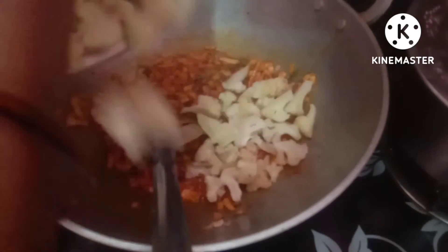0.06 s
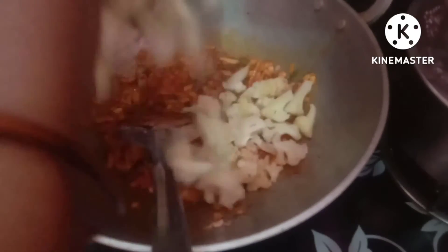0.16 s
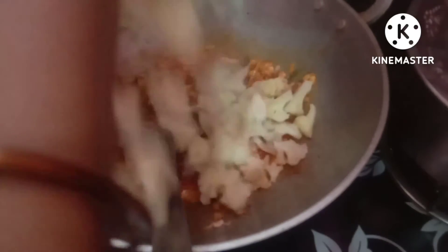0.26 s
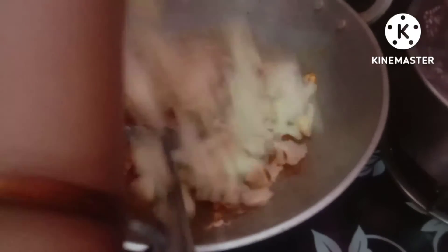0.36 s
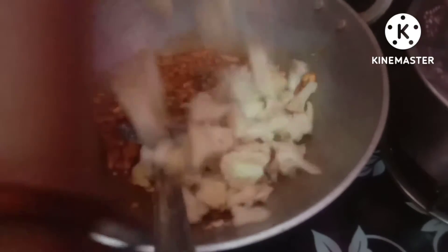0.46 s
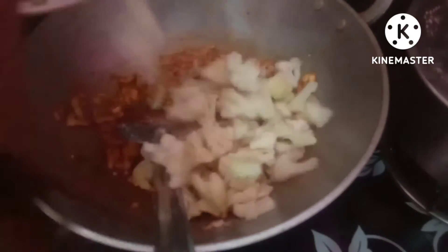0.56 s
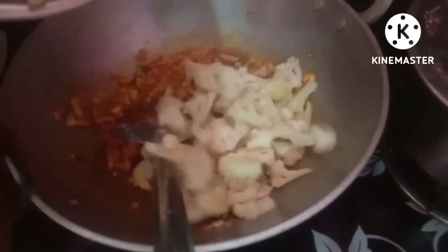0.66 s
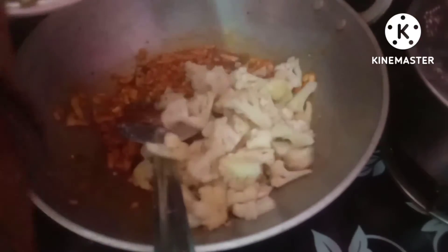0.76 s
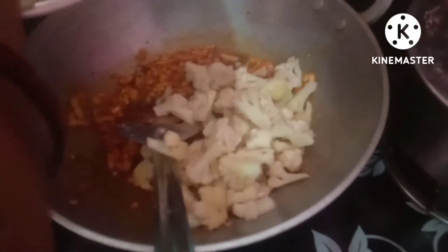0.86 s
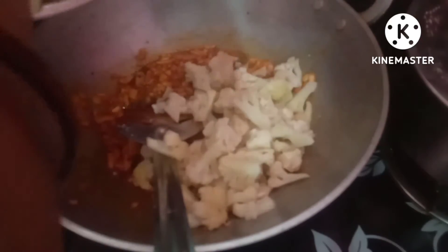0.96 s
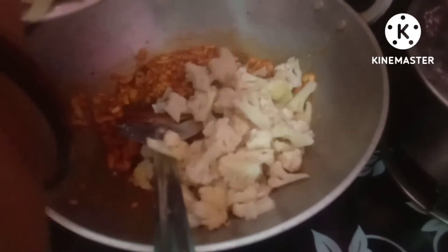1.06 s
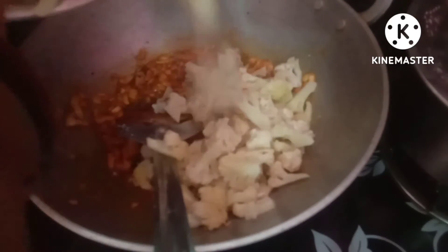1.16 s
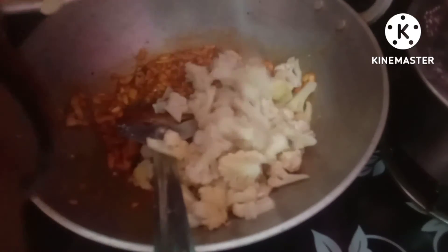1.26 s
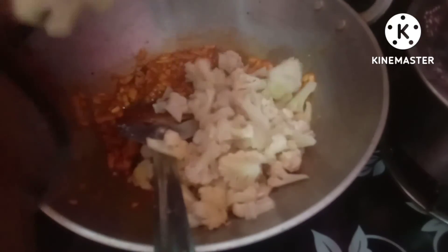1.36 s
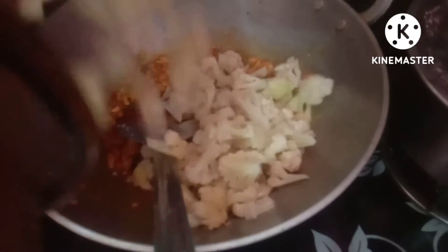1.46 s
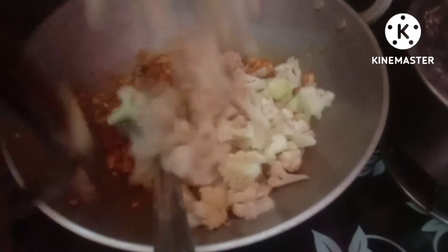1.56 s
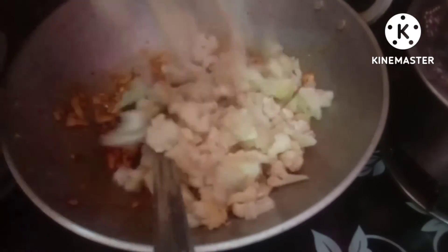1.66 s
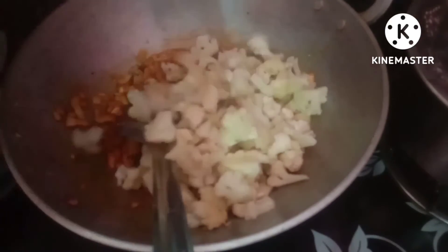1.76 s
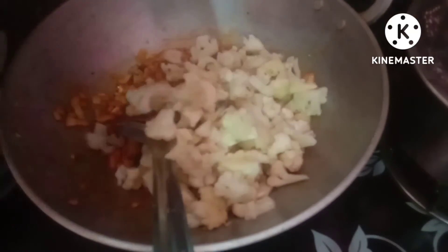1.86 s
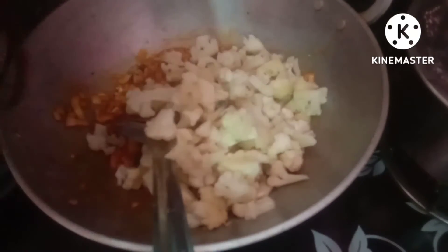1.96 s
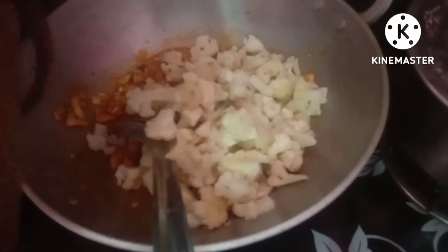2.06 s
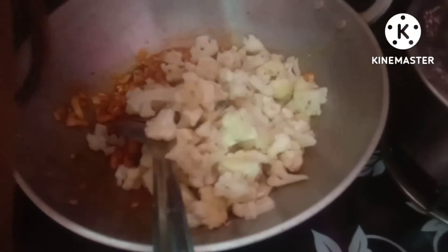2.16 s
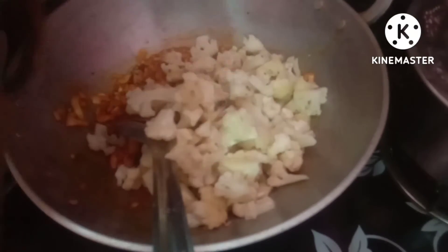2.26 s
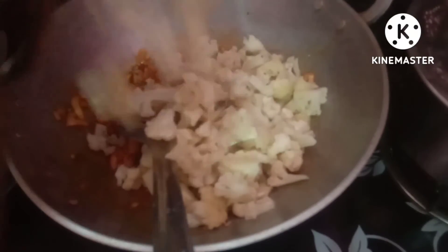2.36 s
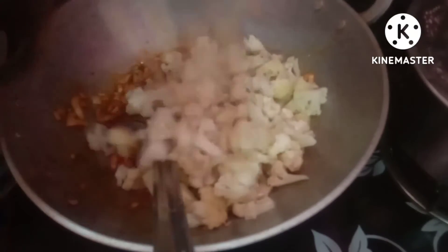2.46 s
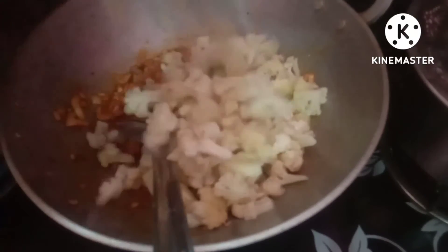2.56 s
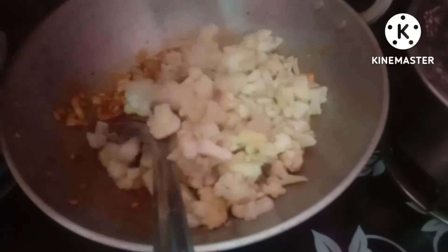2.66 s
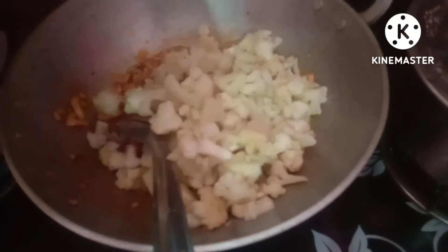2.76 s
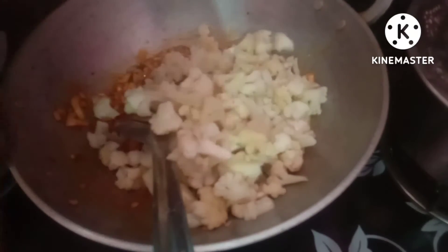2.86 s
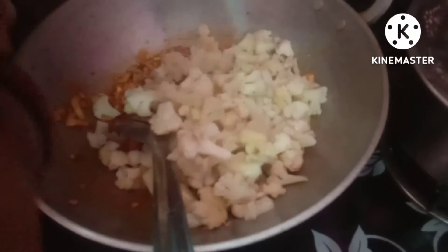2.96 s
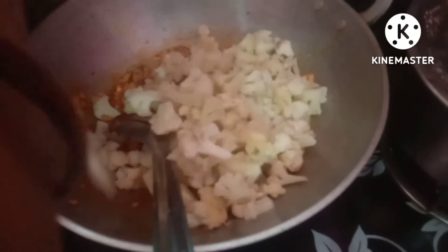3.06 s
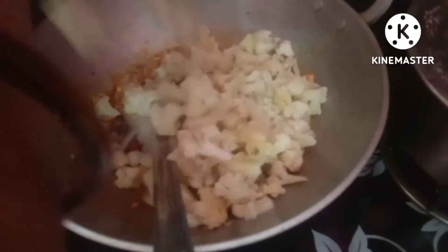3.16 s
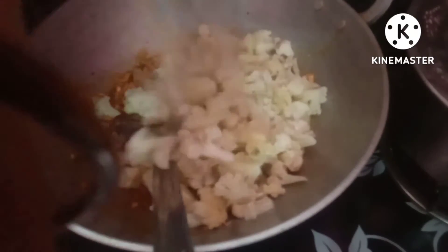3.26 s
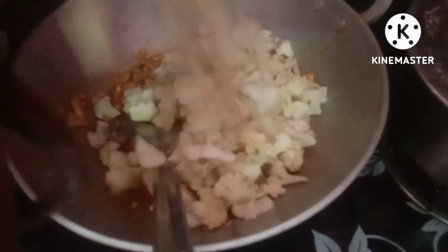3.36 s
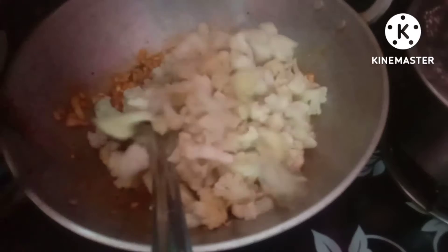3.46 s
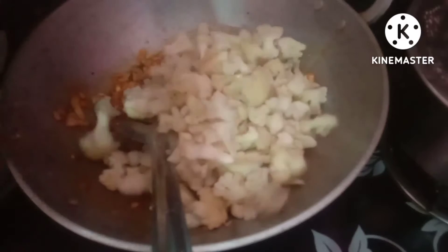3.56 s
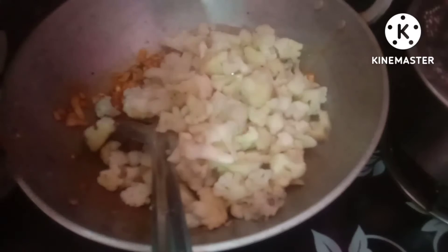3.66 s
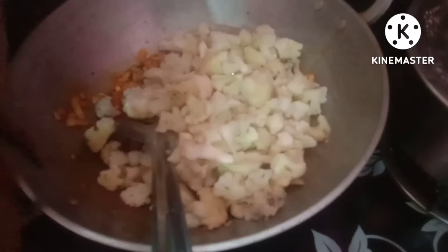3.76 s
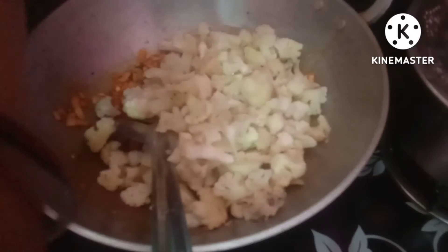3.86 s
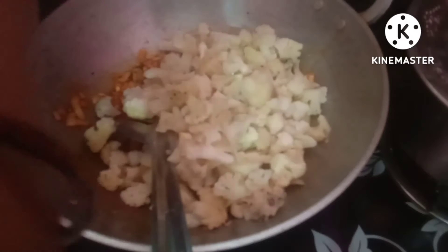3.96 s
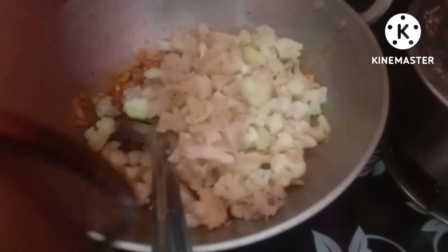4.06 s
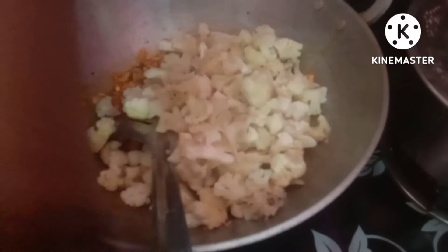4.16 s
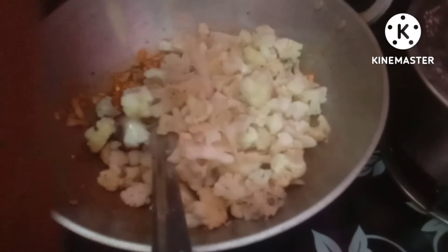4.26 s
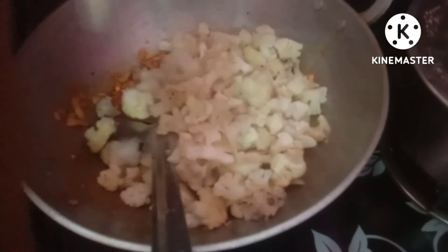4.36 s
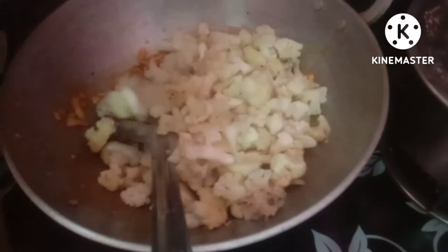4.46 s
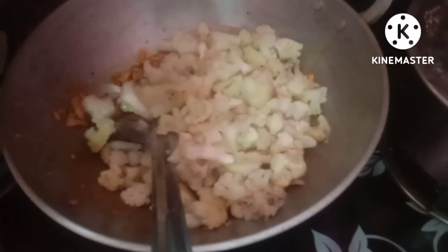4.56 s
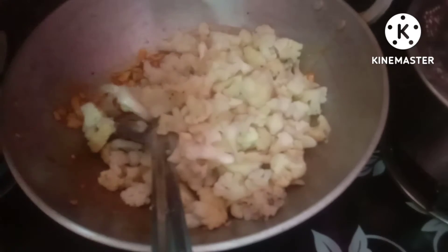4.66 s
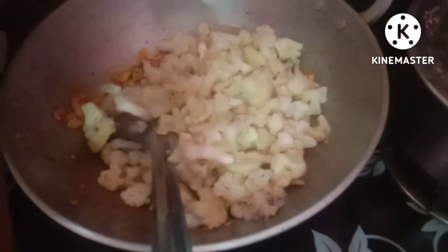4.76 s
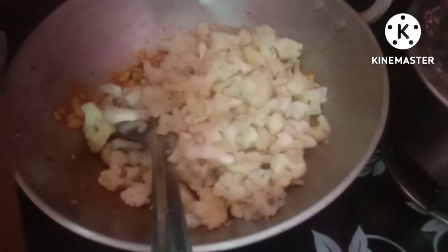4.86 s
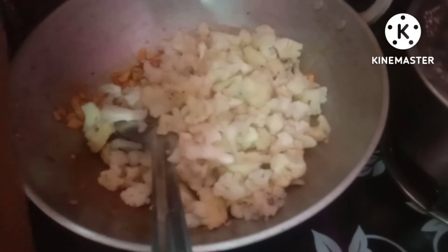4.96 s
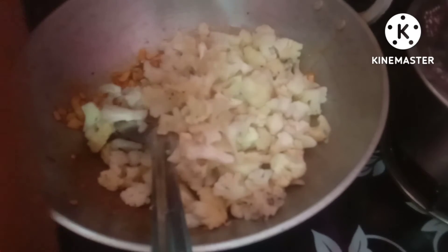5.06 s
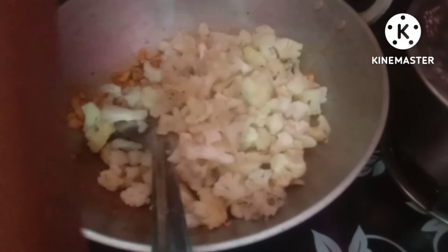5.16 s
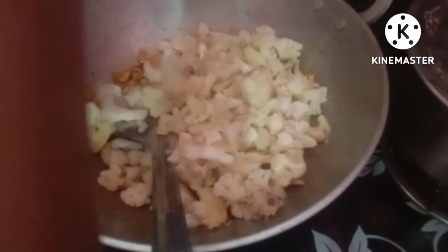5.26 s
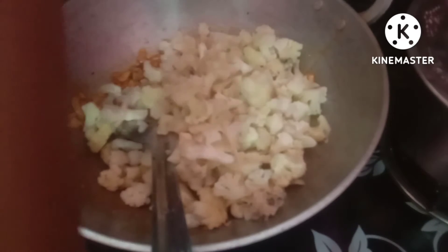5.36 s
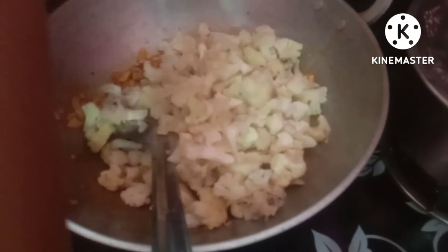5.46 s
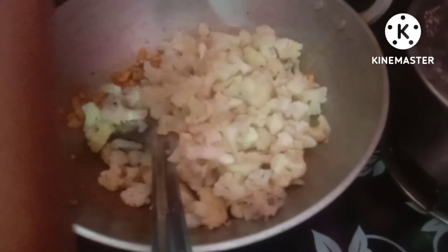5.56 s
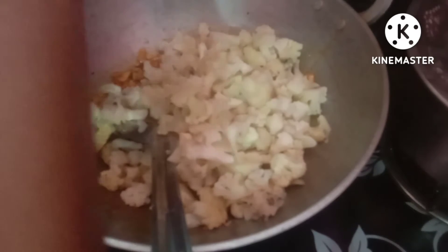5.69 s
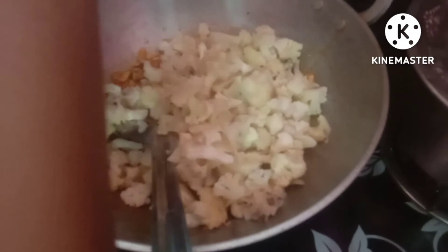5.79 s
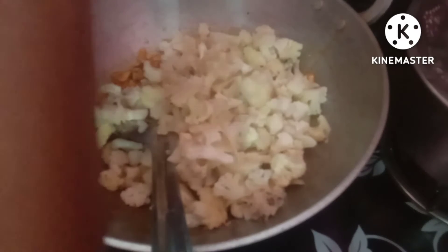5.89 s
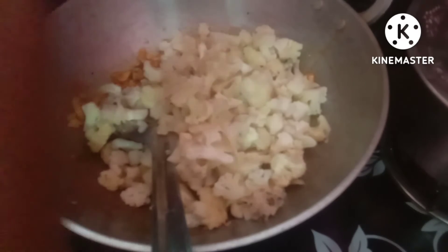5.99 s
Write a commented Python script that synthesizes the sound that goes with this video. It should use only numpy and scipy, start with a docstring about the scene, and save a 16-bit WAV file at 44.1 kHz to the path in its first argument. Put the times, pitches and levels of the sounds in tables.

```python
"""A kitchen, close to a metal pan of frying masala. Handfuls of chopped vegetables drop in,
thud on the heap and rattle the steel ladle against the pan. Bursting bubbles make the oil
fizz and spit, more as the wet pieces heat up. Two steady tones hum over a low rumble
with mains buzz that swells now and then."""
import sys
import numpy as np
from scipy import signal
from scipy.fft import rfft, irfft, next_fast_len
from scipy.io import wavfile
from scipy.ndimage import uniform_filter1d

SR = 44100
rng = np.random.default_rng(int(sys.argv[2]) if len(sys.argv) > 2 else 0)


def to_wav(s):
    """Save 16-bit WAV."""
    ch = np.atleast_2d(s).T  # columns
    pcm = np.round(np.clip(ch, -1, 1) * 32767)  # PCM
    wavfile.write(sys.argv[1], SR, pcm.astype(np.int16))


N = 265923

# frying over time: time_s, fizz_db, spray_db, seethe_db
FRYING_LEVELS = [(0.0, -45.5, -61, -51), (0.26, -45, -56, -49), (0.4, -39, -49, -44),
                 (0.64, -38.5, -46, -47.5), (0.8, -36, -41.5, -49.5), (1.4, -34.5, -47, -48),
                 (1.9, -33.5, -43, -46.5), (2.6, -35, -45, -48), (3.56, -35.5, -44.5, -47),
                 (3.93, -33, -41.5, -46), (4.3, -33, -44, -46), (5.17, -32, -41.5, -43),
                 (5.46, -28, -43, -42), (6.03, -29, -42.5, -41.5)]
# spectra of fizz, finest spray and deep seething: freq_hz, gain_db
FIZZ_SPECTRUM = [(1500, -33), (2300, -16.5), (2800, -7.5), (4700, -3.5), (5400, -0.5), (6000, 2), (6400, 0),
                 (6620, -5), (6900, -1), (7400, -2.5), (8200, -17), (10500, -23), (13500, -28.5)]
SPRAY_SPECTRUM = [(6000, -20), (8500, -3), (12000, -9.5), (13700, -13), (14200, -11), (14650, 5.5),
                  (15000, 8.5), (15500, -2.5)]
SEETHE_SPECTRUM = [(600, -45), (780, -17.5), (900, -8.5), (1300, -0.5), (1550, -5), (1800, -3),
                   (2500, -12.5), (4000, -67)]
# stove rumble, buzz / upper / lower band: centre_hz, width_hz
RUMBLE_BANDS = [(99.4, 21.6), (150, 13), (64.5, 28)]
# rumble swells: start_s, hold_s, buzz_db, upper_db, lower_db
RUMBLE_SWELLS = [(0.335, .1, -45, -56, -56), (0.468, 0.17, -55, -46.5, -57), (.62, 0.45, -42.5, -57, -60),
                 (1.21, 0.13, -50, -65, -65), (1.463, .12, -44, -67, -59), (1.597, .28, -45, -52, -52.5),
                 (1.93, 0.25, -53, -61, -54.5), (2.49, 0.1, -57, -60, -62), (2.7, 0.24, -57, -60, -56),
                 (3.11, 0.042, -51, -57, -58), (3.324, .06, -55, -59, -70), (3.773, .09, -54, -50, -65),
                 (4.304, 0.13, -47, -47, -58), (4.67, 0.1, -54, -58, -62), (4.88, 0.15, -44.5, -64, -61),
                 (5.124, 0.14, -49, -61, -59), (5.527, 0.074, -49, -55, -62),
                 (5.72, 0.092, -44.5, -56, -58), (5.91, .12, -44.5, -64, -57)]
# steady tones: pitch_hz, rms_db
HUM_TONES = [(434, -51), (482.6, -48)]
# room air: freq_hz, gain_db
ROOM_SPECTRUM = [(15, -48), (30, -45), (100, -4), (156, -13), (210, -26.5), (310, -12.5), (380, -15.5),
                 (460, -4), (560, -12), (650, -17), (760, -24.5), (900, -14.5), (1200, -46)]
# ladle jolts: start_s, level_db, chatter_s, deep_boost_db
LADLE_JOLTS = [(0.182, -32.5, 0.0078, 17), (0.23, -27, 0.026, 15), (0.2885, -11.5, 0.017, 3),
               (0.325, -12.5, 0.013, 3.5), (0.346, -22.5, 0.0089, 8), (0.389, -24, 0.011, 2),
               (0.395, -13, 0.011, 3.5), (0.482, -19, 0.01, -1), (0.492, -11.5, 0.011, -4),
               (0.503, -12, 0.019, 9), (0.531, -20.5, 0.009, 15), (0.601, -20, 0.027, 3.5),
               (1.265, -22.5, 0.01, -12), (1.36, -22.5, 0.011, -11), (1.42, -26, 0.014, 2),
               (1.571, -11, 0.01, 5), (1.649, -12.5, 0.017, 8), (1.6697, -12, 0.014, -3),
               (1.677, -10.5, 0.015, 1.5), (1.702, -22.5, 0.0084, 19), (1.923, -23, 0.0088, -12),
               (3.188, -21, 0.0077, 9), (3.497, -19, 0.022, 10), (3.514, -24, 0.011, 9),
               (3.56, -28, 0.011, -3)]
# modes of ladle and pan, deepest first: pitch_hz
MODE_HZ = [1240, 1690, 1879, 2281, 2440, 2742, 3040, 3155, 3705, 4175, 4235, 4555, 4620, 4940, 5431, 5485,
           5590, 5700, 5910, 6140, 6270, 6400, 6450, 6980, 7255, 8340, 9490, 9850, 10500]
# the same modes: width_hz, weight_db
MODE_SHAPES = [(4.96, -27.5), (29.8, -34), (19.4, -9.5), (13.4, -11), (20, -16), (40, -19), (40, -30),
               (19.6, -2.5), (40, -11.5), (30, -33), (30, -8), (21.7, 0.5), (30, -35), (40, -15), (30, -32),
               (24.7, 3), (35, -23), (35, 1.5), (30, -5), (40, -26), (30, -2.5), (25.6, 8.5), (30.5, -14),
               (30, -7), (30, -4.5), (50, -23), (70, -40), (50, -12), (90, -38)]
# steel on steel: freq_hz, gain_db
SCRAPE_SPECTRUM = [(700, -6), (1500, -2.5), (3000, -2.5), (6000, 3), (7600, -6.5), (9000, -23.5),
                   (15000, -17)]
# soft pieces landing: start_s, peak_db, pitch_hz
LANDINGS = [(0.345, -36, 615), (0.519, -38, 610), (0.579, -37.5, 630), (0.958, -36, 610),
            (1.576, -35.5, 581), (1.659, -36.5, 770), (1.791, -42, 570), (1.944, -41, 770)]
# oil spits: start_s, tick_db, puff_db, knock_db
OIL_SPITS = [(2.6844, -21, -41, -30.5), (2.7397, -21, -28, -49), (2.8615, -24, -22.5, -43),
             (2.948, -27, -40, -38), (2.9744, -16, -29, -44), (3.0451, -22, -41, -30.5),
             (3.2492, -24, -36, -37), (3.321, -24, -32, -39), (3.694, -25, -36, -42),
             (3.782, -20, -23, -40), (3.926, -25, -36, -41), (4.199, -22, -28, -41), (4.43, -18, -25, -43),
             (4.9214, -26, -35, -39), (5.4448, -19, -31, -35)]
# tick of a spit: freq_hz, gain_db
TICK_SPECTRUM = [(800, -30), (1300, -9), (2500, -9), (6500, 12), (9000, -11), (15000, -20)]

PAN_HZ = MODE_HZ[0]


def gain_of(db):
    """Decibels to amplitude."""
    return 10 ** (np.asarray(db) / 20)


def unit_rms(x):
    """Scales to rms 1."""
    return x / np.sqrt(np.mean(x ** 2) + 1e-20)


def unit_peak(x):
    """Scales to peak 1."""
    return x / abs(x).max()


def add(mix, start_s, sound):
    """Mixes a sound in at start_s."""
    part = mix[round(start_s * SR):][:len(sound)]
    part += sound[:len(part)]


def resonate(x, hz, width_hz, stages=1):
    """Unity-gain resonators in series: shift hz to zero, smooth, shift back."""
    carrier = np.exp(2j * np.pi * hz * np.arange(len(x)) / SR)
    pole = np.exp(-np.pi * width_hz / SR)
    for _ in range(stages):
        x = 2 * (carrier * signal.lfilter([1 - pole], [1, -pole], x / carrier)).real
    return x


def colour(x, spectrum):
    """Filters by a spectrum table on a log-frequency axis; rms 1."""
    size = next_fast_len(len(x))
    hz, db = np.transpose(spectrum)
    bin_db = np.interp(np.log(np.fft.rfftfreq(size, 1 / SR) + 1), np.log(hz + 1), db)
    return unit_rms(irfft(rfft(x, size) * gain_of(bin_db), size)[:len(x)])


def patchy_hiss(window, depth_db, bins, frames):
    """Hiss whose level drifts in patches of bins by frames."""
    _, _, spectra = signal.stft(rng.standard_normal(N), SR, nperseg=window)
    patches = uniform_filter1d(rng.standard_normal(spectra.shape), bins, axis=0)
    patches = unit_rms(uniform_filter1d(patches, frames, axis=1))
    _, hiss = signal.istft(spectra * gain_of(depth_db * patches), SR, nperseg=window)
    return unit_rms(hiss[:N])


def bubbles(rate_per_s, spread_db, patchy_db, singing_db, burst_share=0.15):
    """Dense hiss with thin singing streaks, plus single bursts, a few of them large."""
    hiss = patchy_hiss(256, patchy_db, bins=8, frames=10)
    hiss += patchy_hiss(1024, singing_db, bins=2, frames=4)
    sizes = gain_of(spread_db * np.minimum(rng.exponential(1, N), 3.5))
    onsets = rng.random(N) < rate_per_s / SR
    bursts = signal.lfilter([1], [1, -0.96], sizes * onsets) * rng.standard_normal(N)  # about 1 ms each
    return np.sqrt(1 - burst_share) * unit_rms(hiss) + np.sqrt(burst_share) * unit_rms(bursts)


def frying():
    """Three sizes of bubbles; the largest also ring the pan's deepest mode."""
    time_s, *columns = np.transpose(FRYING_LEVELS)
    fizz_db, spray_db, seethe_db = [np.interp(np.arange(N) / SR, time_s, db) for db in columns]
    shared = bubbles(rate_per_s=540, spread_db=3, patchy_db=1, singing_db=4.5)
    fine = bubbles(rate_per_s=420, spread_db=7, patchy_db=0, singing_db=4)
    fizz = colour(shared, FIZZ_SPECTRUM)
    spray = colour(0.52 * shared + 0.72 * fine, SPRAY_SPECTRUM)
    seethe = colour(shared, SEETHE_SPECTRUM)
    seethe += gain_of(-5.5) * unit_rms(resonate(seethe, PAN_HZ, width_hz=15.4))
    return gain_of(fizz_db) * fizz + gain_of(spray_db) * spray + gain_of(seethe_db) * unit_rms(seethe)


def rumble_gains(rest_db=(-59.5, -68, -73.5), waver_db=1.5, rise_s=0.015, ebb_s=0.03):
    """Gain per band: a wavering rest level plus swells that rise, hold and ebb."""
    t = np.arange(0, N, 200) / SR
    drift = uniform_filter1d(uniform_filter1d(rng.standard_normal((3, len(t))), 16), 16)
    power = gain_of(np.array(rest_db)[:, None] + waver_db * unit_rms(drift)) ** 2
    for start_s, hold_s, *band_db in RUMBLE_SWELLS:
        rise = np.exp(-(np.maximum(start_s - t, 0) / rise_s) ** 2)
        ebb = np.exp(-(np.maximum(t - start_s - hold_s, 0) / ebb_s) ** 2)
        power += (gain_of(band_db)[:, None] * rise * ebb) ** 2
    return [np.interp(np.arange(N) / SR, t, np.sqrt(band)) for band in power]


def stove_rumble(buzz_hz=100):
    """Three low noise bands; the middle one carries a buzz at twice the mains frequency."""
    buzz_gain, upper_gain, lower_gain = rumble_gains()
    middle, upper, lower = [unit_rms(resonate(rng.standard_normal(N), hz, width_hz, stages=2))
                            for hz, width_hz in RUMBLE_BANDS]
    tone = np.sin(2 * np.pi * (buzz_hz * np.arange(N) / SR + rng.random()))
    buzz = unit_rms(1.26 * tone + 0.71 * middle)
    return buzz_gain * buzz + upper_gain * upper + lower_gain * lower


def hum():
    """Two steady tones, each wavering slightly with narrow noise."""
    out, t = np.zeros(N), np.arange(N) / SR
    for hz, rms_db in HUM_TONES:
        waver = unit_rms(resonate(rng.standard_normal(N), hz, width_hz=24))
        tone = np.sqrt(2) * np.sin(2 * np.pi * (hz * t + rng.random()))
        out += gain_of(rms_db) * (tone + 0.073 * waver)
    return out


def room_air(rms_db=-50.5):
    """Dull, drifting noise of the room."""
    return gain_of(rms_db) * colour(patchy_hiss(2048, depth_db=4, bins=3, frames=4), ROOM_SPECTRUM)


def ladle_rattle(build_s=0.0059, settle_s=0.036, muffle_s=0.02, spot_spread_db=2):
    """Each jolt is a short run of uneven contacts that rings the steel at a new spot."""
    out, ring_t, t = np.zeros(N), np.arange(16000) / SR, np.arange(4000) / SR
    hz = np.array(MODE_HZ)
    width_hz, weight_db = np.transpose(MODE_SHAPES)
    modes = np.exp(-np.pi * width_hz[:, None] * ring_t) * np.sin(2 * np.pi * hz[:, None] * ring_t)
    depth = np.clip(np.log2(4500 / hz), 0, 1)
    spots_db = spot_spread_db * rng.standard_normal((len(LADLE_JOLTS), len(hz)))
    noises = rng.standard_normal((len(LADLE_JOLTS), len(t)))
    for (start_s, level_db, chatter_s, deep_db), spot_db, noise in zip(LADLE_JOLTS, spots_db, noises):
        progress = t / chatter_s
        swing = np.minimum(0.52 + 0.21 * progress, 1) * np.exp(-progress ** 4)  # builds, stops short
        settling = 0.5 * np.exp(-t / settle_s)
        attack = np.minimum(0.53 + t / build_s, 1)
        force = noise * np.sqrt(abs(noise)) * (swing + settling) * attack
        chatter = np.diff(force, prepend=0)
        strength = gain_of(weight_db + deep_db * depth + spot_db) / hz
        # food on the steel damps all but the deepest mode
        muffled = strength[1:] @ modes[1:] * np.exp(-ring_t / muffle_s)
        ring = unit_peak(signal.oaconvolve(chatter, muffled))
        pan = gain_of(weight_db[0] + 0.58 * deep_db) * unit_peak(signal.oaconvolve(chatter, modes[0]))
        scrape = gain_of(0.33 * deep_db - 20) * colour(chatter, SCRAPE_SPECTRUM)
        scrape = np.pad(scrape, (0, len(ring) - len(t)))
        add(out, start_s - 0.001, gain_of(level_db) * (ring + pan + scrape))
    return signal.sosfilt(signal.butter(3, [850, 9500], "band", fs=SR, output="sos"), out)


def vegetable_thuds(attack_s=0.0046, decay_s=0.05):
    """Soft pieces land on the heap: dull, hollow knocks with two resonances."""
    out, t = np.zeros(N), np.arange(5000) / SR
    for start_s, peak_db, hz in LANDINGS:
        push = rng.standard_normal(len(t)) * np.exp(-(t / decay_s) ** 2) * np.minimum(t / attack_s, 1)
        upper = resonate(push, hz, width_hz=230, stages=2)
        lower = resonate(push, 0.56 * hz, width_hz=96, stages=2)
        add(out, start_s, gain_of(peak_db) * unit_peak(upper + 0.68 * lower))
    return out


def oil_spits(puff_hz=5770, lead_samples=100):
    """A steam pocket bursts: sharp tick, puff of spray, short knock on the pan."""
    out, t = np.zeros(N), np.arange(2500) / SR
    for start_s, tick_db, puff_db, knock_db in OIL_SPITS:
        noise = rng.standard_normal(len(t))
        tick = colour(np.roll(noise * np.exp(-t / 0.0004), lead_samples), TICK_SPECTRUM)
        puff = resonate(noise, puff_hz, width_hz=1400, stages=2) * np.exp(-t / 0.011)
        pan = np.sin(2 * np.pi * PAN_HZ * t) * np.exp(-t / 0.0089)
        scrape = 1.24 * colour(noise, SCRAPE_SPECTRUM) * np.exp(-t / 0.01)
        tail = gain_of(puff_db) * unit_peak(puff) + gain_of(knock_db) * (pan + scrape)
        tail = np.pad(tail, (lead_samples, 0))[:len(t)]
        add(out, start_s - lead_samples / SR, gain_of(tick_db) * unit_peak(tick) + tail)
    return signal.sosfilt(signal.butter(4, 950, "high", fs=SR, output="sos"), out)


def scene():
    """One microphone: the same sound on both channels."""
    mix = frying() + stove_rumble() + hum() + room_air()
    mix += ladle_rattle() + vegetable_thuds() + oil_spits()
    return np.tile(mix, (2, 1))


def record(dry):
    """The phone's band limit, 15.5 kHz."""
    lowpass = signal.firwin(2047, 15500, window=("kaiser", 9), fs=SR)
    return signal.oaconvolve(dry, lowpass[None], "same")


dry = scene()
out = record(dry)
to_wav(out)
```